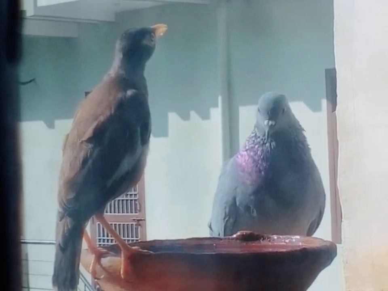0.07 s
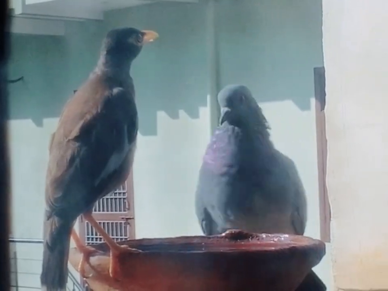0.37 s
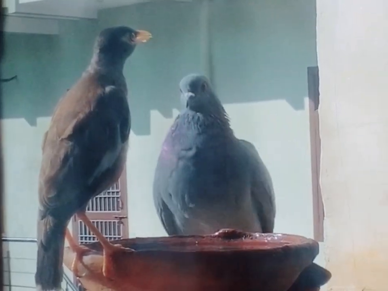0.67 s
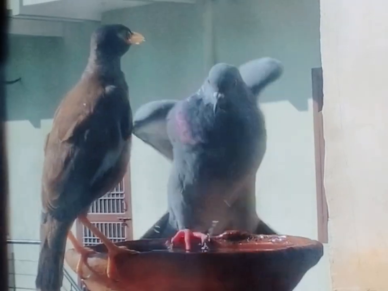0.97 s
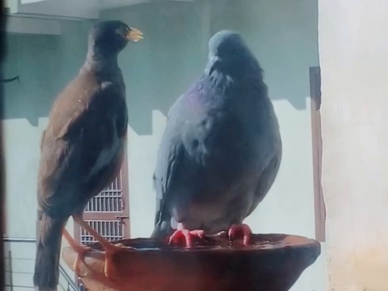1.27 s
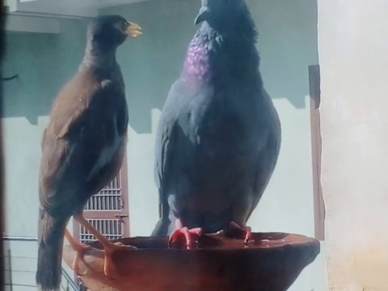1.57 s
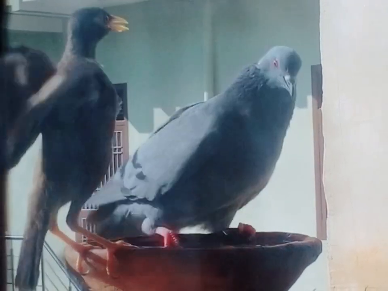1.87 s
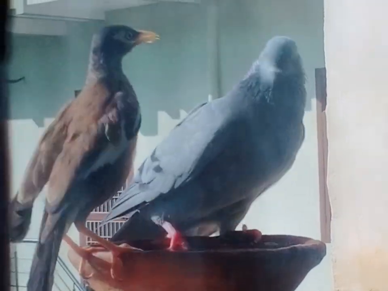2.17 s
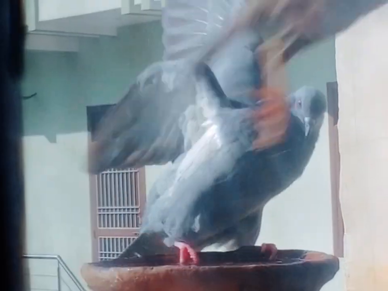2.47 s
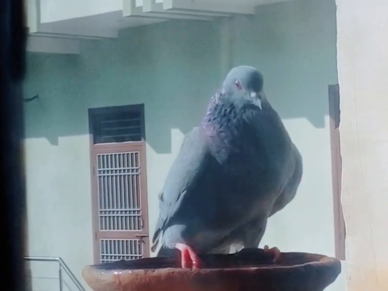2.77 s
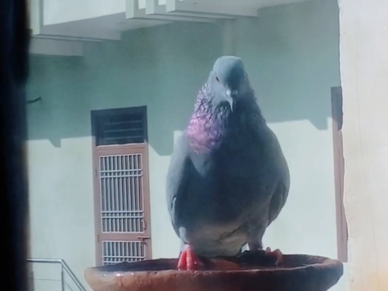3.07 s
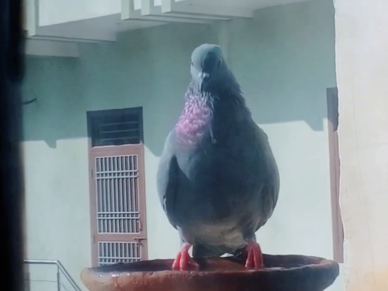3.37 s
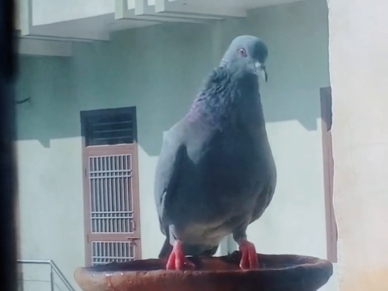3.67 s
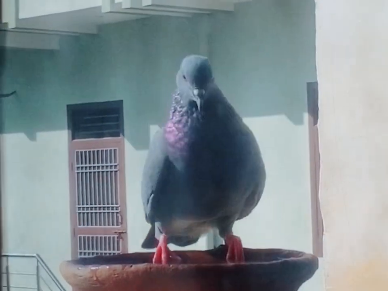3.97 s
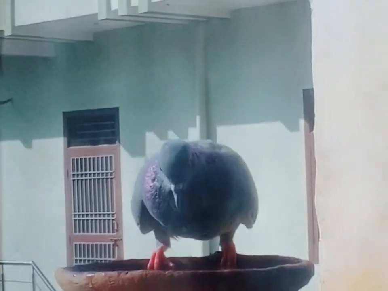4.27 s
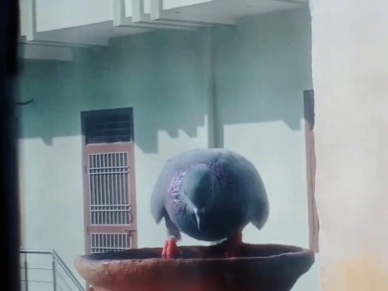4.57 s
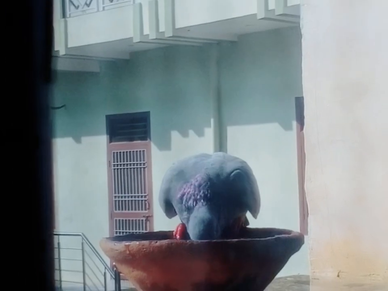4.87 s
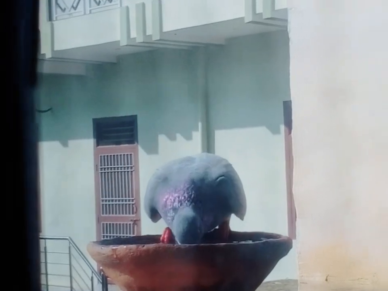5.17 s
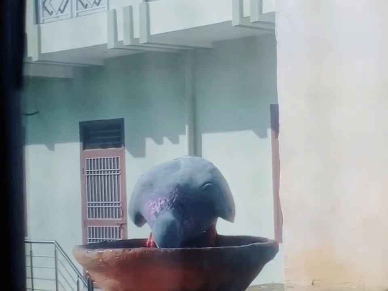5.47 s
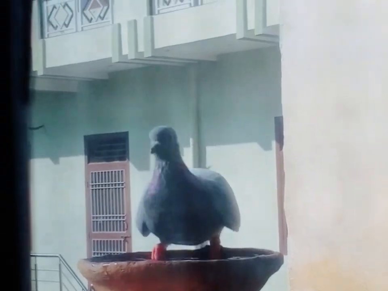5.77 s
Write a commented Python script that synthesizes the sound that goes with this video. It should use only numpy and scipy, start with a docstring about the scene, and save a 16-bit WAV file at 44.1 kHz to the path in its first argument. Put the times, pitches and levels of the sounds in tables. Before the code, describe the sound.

In a walled courtyard, a nearby myna gives a few soft notes while birds farther off whistle and chatter briefly. A pigeon shifts with faint, dull thuds. About halfway through, the myna breaks into louder pairs of bright, raspy calls, with one harsh squeal among them. The pigeon's feet tap lightly on a clay bowl and the calls soften. The walls ring after each call, over a faint town rumble.

```python
"""A town hums faintly behind a walled courtyard, where birds gather round a clay water bowl.
A myna gives a few soft notes, and the walls ring after each. Other birds whistle and chatter,
and a pigeon shifts with dull thuds. Near 3 s the myna starts pairs of bright calls, which rasp
as the two sides of its voice box beat together. It squeals once, the pigeon steps on the bowl,
and the calls grow softer."""
import sys
import numpy as np
from scipy import signal
from scipy.fft import rfft, irfft, next_fast_len
from scipy.io import wavfile

SR = 44100
rng = np.random.default_rng(int(sys.argv[2]) if len(sys.argv) > 2 else 0)


def persist_wave(psi):
    """Save psi, clipped to +-1, as 16-bit WAV."""
    counts = np.round(np.clip(psi, -1, 1) * 32767).astype(np.int16)
    wavfile.write(sys.argv[1], SR, np.atleast_2d(counts).T)


N = 265041

# tone colour of the town's rumble: f/Hz, relative level/dB
TOWN_COLOUR = [(25, -21), (45, -3.5), (62, -10), (110, 0), (250, -1), (400, -6), (630, -11), (900, -7),
               (1500, -7.5), (2600, -14), (4200, -13), (6500, -22), (9500, -41.5), (14000, -38)]
# hums of distant machines: f/Hz, level/dB, pitch drift/Hz
MACHINE_HUMS = [(83.4, -83, 1.6), (1649, -82, 22)]
# myna calls: t/s, length/s, top f/Hz, level/dB, relative pip/dB, rasp/0-1, bite/dB (high tones and hiss)
MYNA_CALLS = [ (0.264, 0.095, 1472, -58.5, -32, 0.75, -7.5), (1.448, .099, 1482, -56.5, -1.5, .74, -3),
              (1.68, 0.078, 1352, -63.5, 12, 0.35, -15), (1.8, .15, 1406, -57, -1.5, .3, -3),
              (2.03, .12, 1345, -61.5, 0.5, 0.47, -6), (2.785, 0.1, 1535, -44, -10.5, 0.53, 8.5),
              (2.99, 0.12, 1511, -43, -7.5, 0.68, 9), (3.546, .13, 1498, -44, -10.5, 0.67, 4.5),
              (3.757, .125, 1435, -45.5, -4, 0.96, -9), (4.288, .145, 1476, -45.5, -9, .85, 2),
              (4.491, .12, 1458, -44, -13, 0.82, -1), (5.044, .17, 1450, -49, -1, 0.68, -12.5),
              (5.268, 0.16, 1438, -50.5, -14, .6, -16), (5.813, .18, 1441, -53, 5, .53, -16)]
# overtones, and side tones from the voice box's two halves: f/pitch, relative level/dB
VOICE_TONES = [(1.085, -11), (2, 4), (2.43, -12.5), (3, -2.5), (3.45, -29), (4, 0.5), (4.499, -14),
               (4.95, -7), (5.7, -26)]
# highest tones of a forceful call: f/pitch, relative level/dB
BITE_TONES = [(7.5, -47), (8.2, -36.5), (9, -31), (9.6, -28.5), (10.3, -27.5)]
# how long the yard rings: f/Hz, time to fade by 60 dB/s
YARD_RING = [(500, 0.34), (1500, 0.72), (3000, 0.52), (6000, 0.5), (9000, 0.38), (14000, 0.12)]
# echoes off the walls: delay/s, relative level/dB
WALL_ECHOES = [(0.011, -3), (.024, -22), (.047, -9.5), (.083, -12), (.205, -25)]
# clear whistles: t/s, length/s, middle f/Hz, level/dB, fall/octaves
CLEAR_NOTES = [ (0.355, 0.05967, 3810, -52.5, 0.034), (0.382, 0.08393, 2720, -57.5, 0.35),
               (0.431, 0.078, 2190, -51.5, 0.043), (0.777, .06, 1610, -63.5, .12),
               (0.962, 0.14, 5561, -70, 0.0091), (1.285, .075, 2182, -58.5, 0.144),
               (2.105, .082, 2473, -55.5, 0.456), (3.126, 0.093, 2195, -67, 0),
               (3.488, 0.028, 6740, -58, 0.07)]
# harsh chatter: t/s, length/s, middle f/Hz, level/dB
CHATTER_NOTES = [(0.69, 0.035, 3200, -52), (0.711, .036, 3270, -40.5), (0.748, 0.05, 2955, -47),
                 (0.789, .038, 3025, -39.5), (0.846, .037, 2858, -46), (3.695, .05, 3485, -43)]
# buzzy notes: t/s, length/s, middle f/Hz, level/dB, fall/octaves, warble amount
BUZZY_NOTES = [(1.174, 0.082, 3463, -50, .11, 0.052), (1.205, .045, 4007, -47.5, 0.067, 0.089),
               (1.233, .096, 2666, -56, 0.59, .14), (1.953, 0.084, 4560, -65, 0, .06),
               (2.19, 0.048, 4520, -66, 0.015, 0.045), (2.205, .28, 7150, -59.5, 0, 0.077),
               (4.97, 0.058, 4440, -64.5, 0.024, .04)]
# the pigeon shifting its weight and wings: t/s, peak level/dB
PIGEON_THUDS = [(1.03, -64), (1.39, -68.5), (1.85, -74), (2.059, -71), (2.701, -57.5), (3.019, -70)]
# the squeal's unrelated tones: length/s, f/Hz, level/dB
SQUEAL_TONES = [(0.19, 3635, -55), (.16, 1296, -62.5), (0.089, 1552, -65), (0.18, 2600, -81),
                (0.048, 6830, -58.5)]
# tone colour of the squeal's harsh start: f/Hz, relative level/dB
SQUEAL_COLOUR = [(1000, -32), (1500, -14), (2100, -17), (2800, -4.5), (3300, -19), (4200, 9), (4800, -1),
                 (6900, -1.5), (8200, -9.5), (9700, -28), (12500, -14), (15500, -15)]
# the pigeon's feet on the bowl: t/s, peak level/dB
PIGEON_STEPS = [(4.181, -56.5), (4.357, -62.5)]
# the clay bowl's own tones: f/Hz, relative level/dB, time to fade by 60 dB/s
BOWL_TONES = [(410, -3.5, 0.16), (514, 1, 0.14), (685.5, -17, .04), (860, -11, 0.064)]


def from_db(db):
    """Turn decibels into a number to multiply by."""
    return 10 ** (np.asarray(db) / 20)


def unit_power(x):
    """Scale a sound so its average power is 1."""
    return x / np.sqrt(np.mean(x ** 2) + 1e-20)


def at_hz(points, hz):
    """Read between a table's rows, spacing octaves evenly."""
    freq, value = np.transpose(points)
    return np.interp(np.log(np.maximum(hz, 1)), np.log(freq), value)


def add(out, start_s, sound):
    """Mix a sound in at a given time."""
    i = max(round(start_s * SR), 0)
    out[i:i + len(sound)] += sound[:N - i]


def wander(size, rate_hz):
    """A smooth random wobble, about 1 in size."""
    hz = np.fft.rfftfreq(size + SR, 1 / SR)
    slow = rfft(rng.standard_normal(size + SR)) / (1 + (hz / rate_hz) ** 4)
    return unit_power(irfft(slow, size + SR))[:size]


def coloured_noise(colour):
    """Noise of power 1 with the given tone colour."""
    gain = from_db(at_hz(colour, np.fft.rfftfreq(N, 1 / SR)))
    return unit_power(irfft(rfft(rng.standard_normal(N)) * gain, N))


def phase_of(hz):
    """How far a wave has turned as its pitch moves."""
    return 2 * np.pi * np.cumsum(hz) / SR


def swell(t, rise_s, fall_s):
    """A smooth fade in and fade out."""
    fade_in = np.sin(np.pi / 2 * np.clip(t / rise_s, 0, 1))
    return fade_in * np.sin(np.pi / 2 * np.clip((t[-1] - t) / fall_s, 0, 1))


def uneven(x, depth_db, rate_hz, octaves=6):
    """Let each low octave of a noise rise and sink by itself; the treble stays steady."""
    size = next_fast_len(N)
    spectrum, hz = rfft(x, size), np.fft.rfftfreq(size, 1 / SR)
    centres = 60 * 2.0 ** np.arange(octaves + 1)
    gains = [from_db(depth_db * wander(next_fast_len(N + SR) - SR, rate_hz)[:N]) for _ in range(octaves)]
    bands = [irfft(spectrum * at_hz(list(zip(centres, share)), hz), size)[:N]
             for share in np.eye(octaves + 1)]
    return sum(gain * band for gain, band in zip(gains + [1], bands))


def town(rumble_db=-70):
    """The far town rumbles unevenly while two machines hum."""
    hum = sum(from_db(db) * unit_power(np.sin(phase_of(hz + drift * wander(N, 23.4))))
              for hz, db, drift in MACHINE_HUMS)
    return hum + from_db(rumble_db) * uneven(coloured_noise(TOWN_COLOUR), depth_db=2.22, rate_hz=7)


def myna_call(length, top_hz, level_db, pip_db, rasp, bite_db, crest=0.7, open_s=0.036,
              jitter=0.0159, detune=0.065, flutter=0.78, flutter_hz=140, hiss_hz=(3080, 6170)):
    """A call starts as a pure pip; then the beak opens and the voice turns bright and harsh."""
    t = np.arange(int(length * SR)) / SR
    progress = t / length
    # the pitch climbs from nearly the same place each time, then sags a little
    push_hz = top_hz - 1444   # how far above a call of middling effort
    first_hz = 1360.4 + 0.096 * push_hz
    climb = first_hz + (top_hz - first_hz) * np.abs(np.sin(np.pi / 2 * progress / crest)) ** 1.38
    sag = top_hz * (1 - 0.03 * ((progress - crest) / (1 - crest)) ** 2)
    pitch = np.where(progress < crest, climb, sag)
    tilt_db = 2.5 + 0.03 * push_hz   # per octave: a call pushed higher is brighter
    tones = [(k, db + tilt_db * np.log2(k / 3)) for k, db in VOICE_TONES]
    tones += [(k, db + bite_db) for k, db in BITE_TONES]
    harsh = rasp * np.minimum(0.65 + progress, 1)
    left, right, rattle, *shakes = wander((len(tones) + 3) * len(t), flutter_hz).reshape(-1, len(t))
    # both sides of the voice box sound, one a little flat, so they beat together
    flat = detune * np.minimum(0.3024 + 1.2 * progress, 1)
    upper = phase_of(pitch * (1 + jitter * np.sqrt(harsh) * left))
    lower = phase_of(pitch * (1 + jitter * np.sqrt(harsh) * right - flat))
    voice = np.zeros(len(t))
    for (k, db), shake in zip(tones, shakes):
        tone = np.sin(k * upper) + 0.93 * harsh * np.sin(k * lower)
        rise_s = open_s * (max(k, 2) / 3) ** 0.93   # higher tones come in more slowly
        voice += from_db(db) * tone * (1 + flutter * harsh * shake) * swell(t, rise_s, 0.02)
    # air rushes through the open beak, most of all late in a forceful call
    hiss_band = signal.butter(4, hiss_hz, "band", fs=SR, output="sos")
    hiss = unit_power(signal.sosfilt(hiss_band, rng.standard_normal(len(t))))
    voice = unit_power(voice) + from_db(bite_db - 14) * hiss * swell(t, length, 0.0077)
    voice *= np.exp(0.11 * harsh * rattle)
    pip = (np.sin(3 * upper) + harsh * np.sin(3 * lower)) / np.hypot(1, harsh)
    pip *= swell(t, 0.008, 0.02) * np.exp(-t / 0.06)
    return from_db(level_db) * (unit_power(voice) + 1.8 * from_db(pip_db) * pip)


def myna():
    """The myna calls softly at first, then in loud pairs that ease off."""
    out = np.zeros(N)
    for start_s, *call in MYNA_CALLS:
        add(out, start_s, myna_call(*call))
    return out


def courtyard(x, direct_db, ring_db=-0.5, overall_db=-2.0, build_s=0.012, escape=1.18):
    """Sound arrives directly, bounces off the walls, and fades ever faster as it escapes to the sky."""
    t = np.arange(SR) / SR
    hz, noise = np.fft.rfftfreq(SR, 1 / SR), rfft(rng.standard_normal(SR))
    centres, fade_times = np.transpose(YARD_RING)
    ring = np.zeros(SR)
    for share, fade_s in zip(np.eye(len(centres)), fade_times):
        band = irfft(noise * at_hz(list(zip(centres, share)), hz), SR)
        ring += band * from_db(-60 * (t / fade_s) ** escape)
    echoes = from_db(ring_db) * ring * (1 - np.exp(-t / build_s)) / np.sqrt(0.044 * SR)
    echoes[0] += from_db(direct_db)
    for delay, echo_db in WALL_ECHOES:
        echoes[int(delay * SR * rng.uniform(0.97, 1.03))] += from_db(echo_db)
    return from_db(overall_db) * signal.fftconvolve(x, echoes)[:N]


def whistle(length, middle_hz, level_db, fall, warble, overtone_db, warble_hz=210, early_fall=0.36):
    """A nearly pure note slides down, slowly at first; a deep, fast warble turns it into chatter."""
    t = np.arange(int(length * SR)) / SR
    first_hz = middle_hz * 2 ** (fall * early_fall)
    last_hz = middle_hz / 2 ** (fall * (1 - early_fall))
    slide = np.interp(t, [0, length / 2, length], [first_hz, middle_hz, last_hz])
    shake_hz = warble_hz * from_db(2 * wander(len(t), 39.9))
    shake = 0.88 * np.sin(phase_of(shake_hz)) + 0.547 * wander(len(t), 384)
    phase = phase_of(slide * 2 ** (warble * 1.372 * np.tanh(shake)))
    tone = np.sin(phase) + from_db(overtone_db) * np.sin(2 * phase)
    return from_db(level_db) * unit_power(tone * swell(t, 0.014, 0.01))


def other_birds(cutoff_hz=6340):
    """Birds farther off chatter, buzz and whistle, with their highest tones cut away."""
    out = np.zeros(N)
    for start_s, *note in CHATTER_NOTES:
        add(out, start_s, whistle(*note, fall=0.298, warble=0.3046, overtone_db=-14.5))
    for start_s, *note in BUZZY_NOTES:
        add(out, start_s, whistle(*note, overtone_db=-13.5))
    for start_s, *note in CLEAR_NOTES:
        add(out, start_s, whistle(*note, warble=0.019, overtone_db=-34))
    return signal.sosfilt(signal.butter(12, cutoff_hz, fs=SR, output="sos"), out + 1e-18)


def pigeon_thuds(middle_hz=130, fade_s=0.026):
    """The pigeon's wings and body make soft, dull thuds."""
    out, t = np.zeros(N), np.arange(SR // 5) / SR
    dull = signal.butter(2, [middle_hz / 2, middle_hz * 2], "band", fs=SR, output="sos")
    for start_s, level_db in PIGEON_THUDS:
        thud = signal.sosfilt(dull, rng.standard_normal(len(t)) * np.exp(-t / fade_s))
        add(out, start_s, from_db(level_db) * thud / np.abs(thud).max())
    return out


def myna_squeal(start_s=3.272, peak_s=3.286, rise_db_per_s=330, fall_db_per_s=780):
    """Unrelated tones creak together; a harsh noise swells and breaks off at their start."""
    out = np.zeros(N)
    for length, hz, level_db in SQUEAL_TONES:
        t = np.arange(int(length * SR)) / SR
        tone = np.sin(phase_of(hz + 30 * wander(len(t), 60.5))) * swell(t, 0.016, 0.32)
        add(out, start_s, from_db(level_db) * unit_power(tone))
    since_peak = np.arange(N) / SR - peak_s
    noise_db = -47.5 + np.minimum(rise_db_per_s * since_peak, -fall_db_per_s * since_peak)
    return out + from_db(noise_db) * coloured_noise(SQUEAL_COLOUR)


def pigeon_steps(scuff_s=0.012):
    """Each foot scuffs the clay bowl, which rings briefly."""
    out, t = np.zeros(N), np.arange(SR // 5) / SR
    ring = sum(from_db(db - 60 * t / fade_s) * np.sin(2 * np.pi * hz * t)
               for hz, db, fade_s in BOWL_TONES)
    for start_s, level_db in PIGEON_STEPS:
        scuff = rng.standard_normal(len(t)) * np.exp(-t / scuff_s)
        knock = signal.fftconvolve(ring, scuff)
        add(out, start_s, from_db(level_db) * knock / np.abs(knock).max())
    return out


def scene():
    """Bird calls ring round the yard, with the pigeon close by and the town behind."""
    calls = courtyard(myna() + myna_squeal(), direct_db=-2.0)
    whistles = courtyard(other_birds(), direct_db=-0.5)
    return (calls + whistles + pigeon_steps() + pigeon_thuds() + town())[None]


def record(dry, cutoff_hz=15750):
    """Cut the very highest treble steeply."""
    return signal.sosfiltfilt(signal.ellip(10, 0.1, 60, cutoff_hz, fs=SR, output="sos"), dry)


dry = scene()
out = record(dry)
persist_wave(out)
```